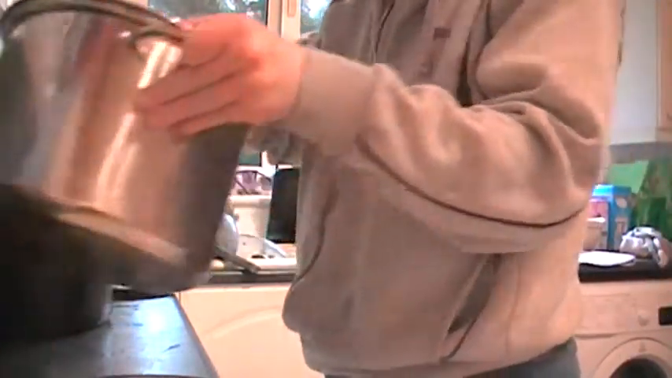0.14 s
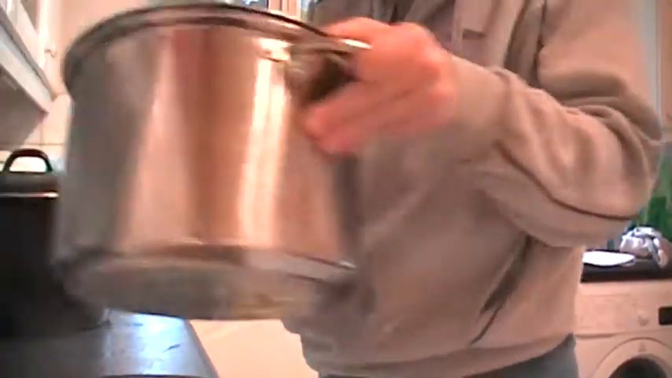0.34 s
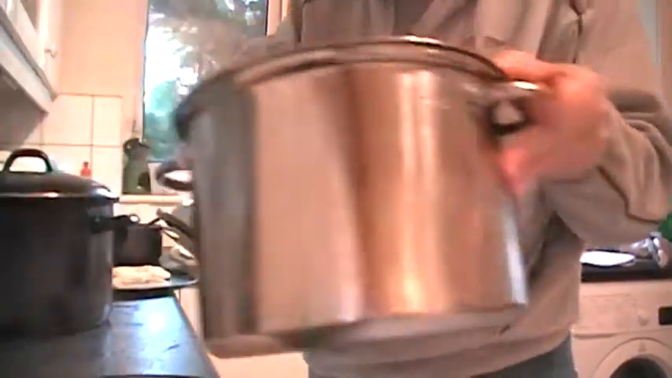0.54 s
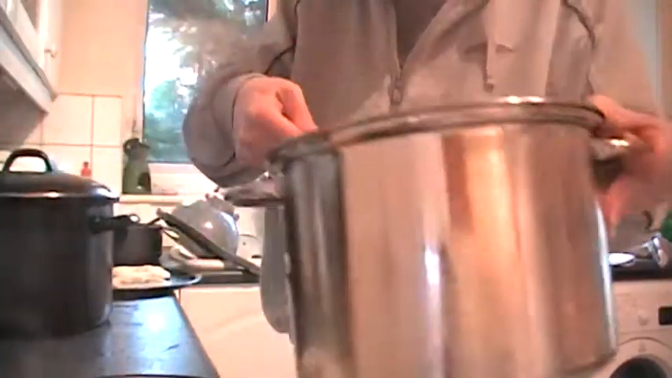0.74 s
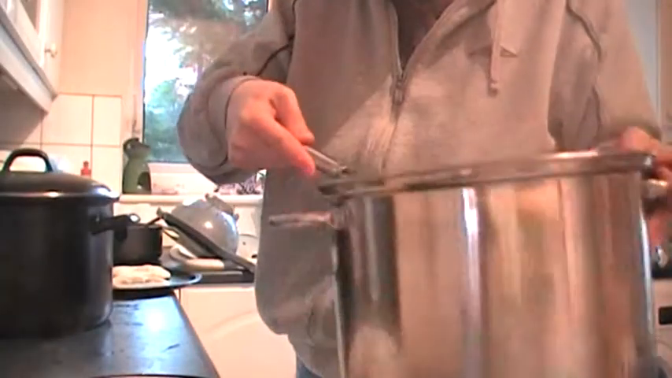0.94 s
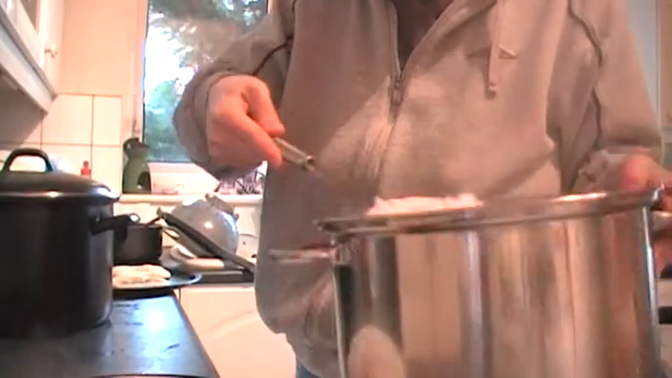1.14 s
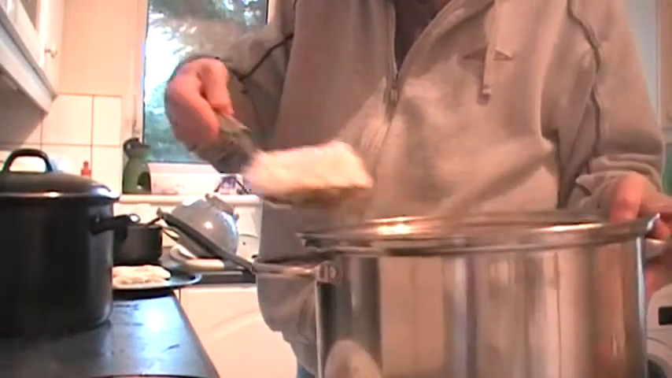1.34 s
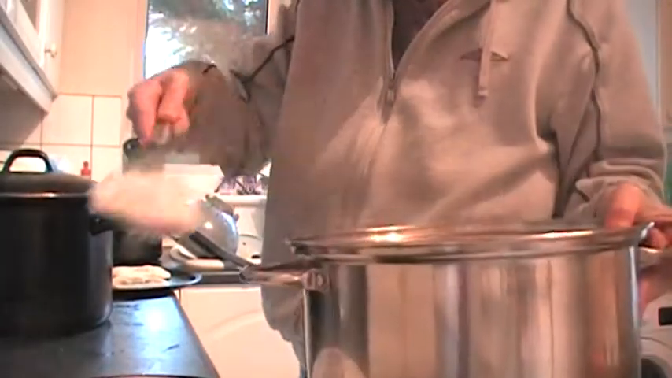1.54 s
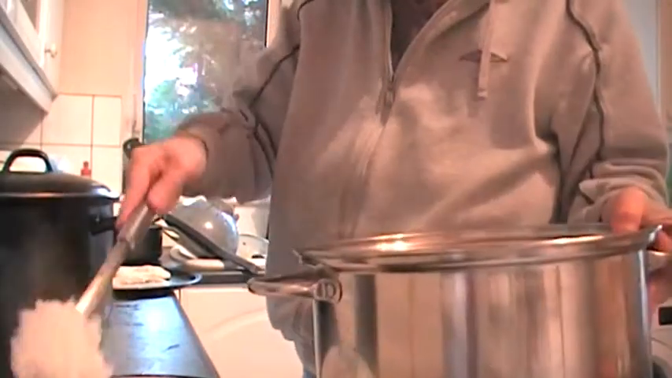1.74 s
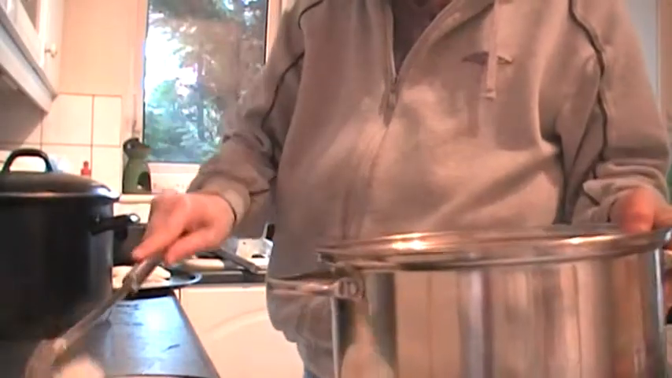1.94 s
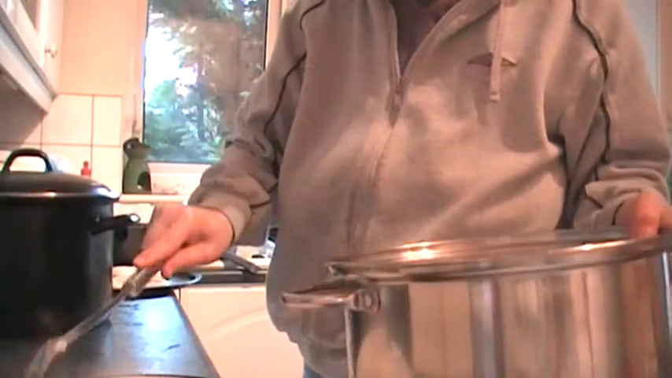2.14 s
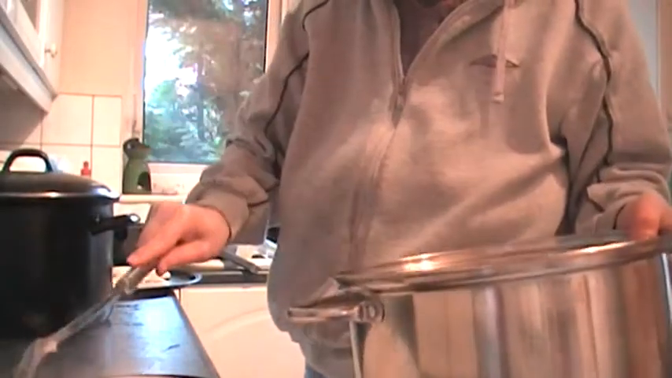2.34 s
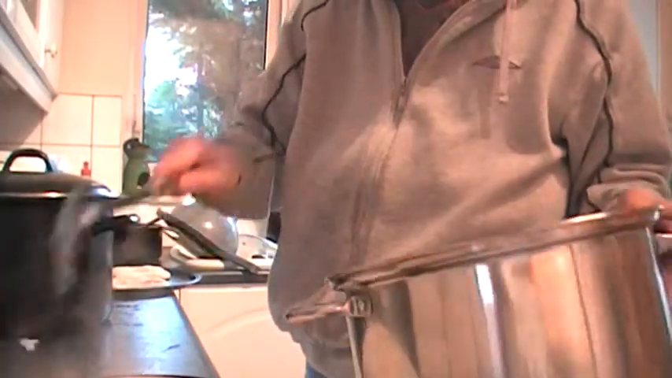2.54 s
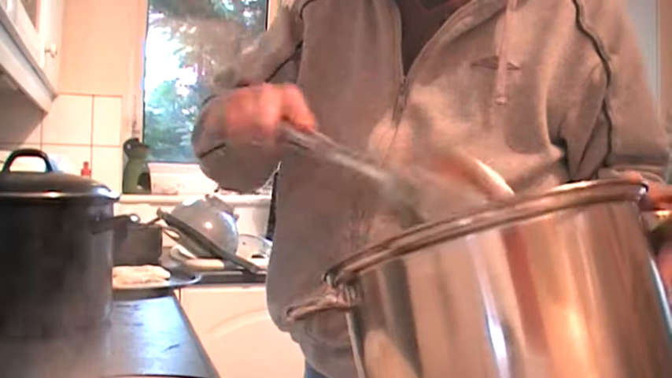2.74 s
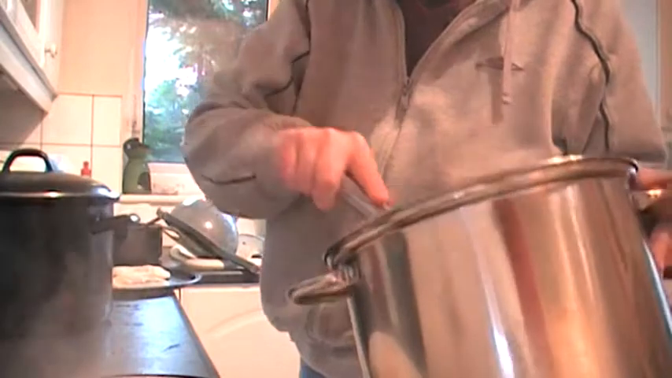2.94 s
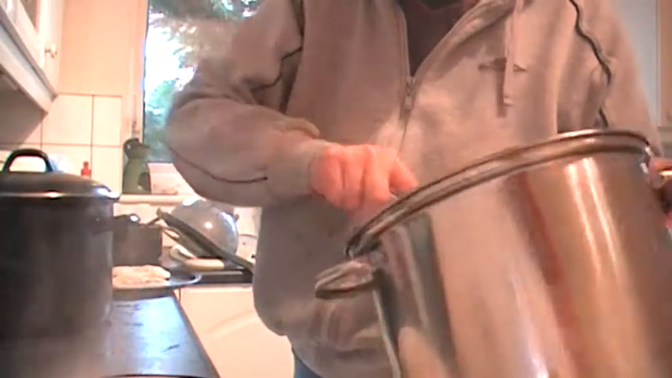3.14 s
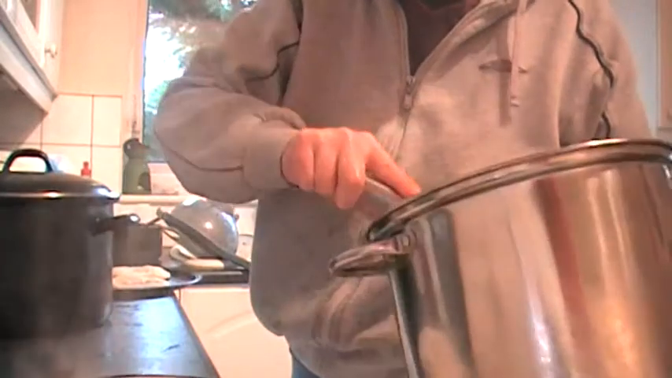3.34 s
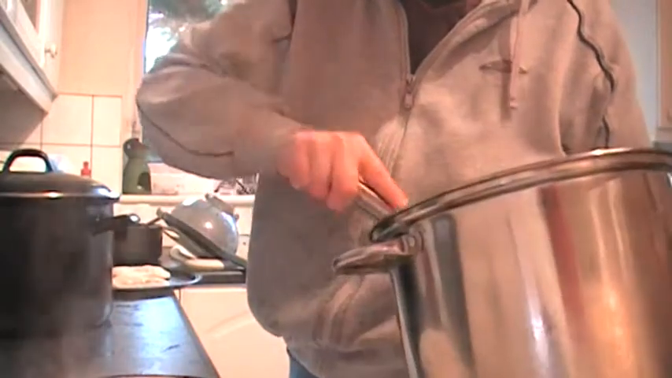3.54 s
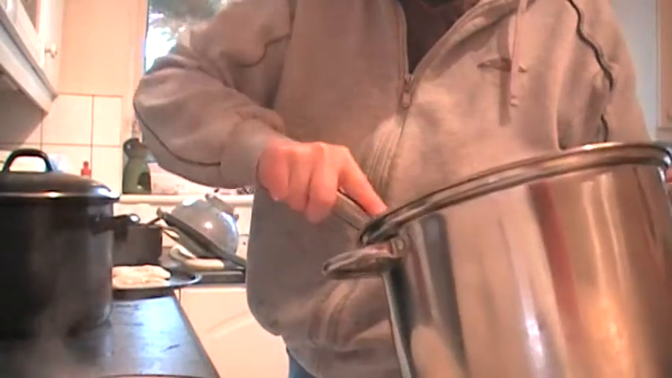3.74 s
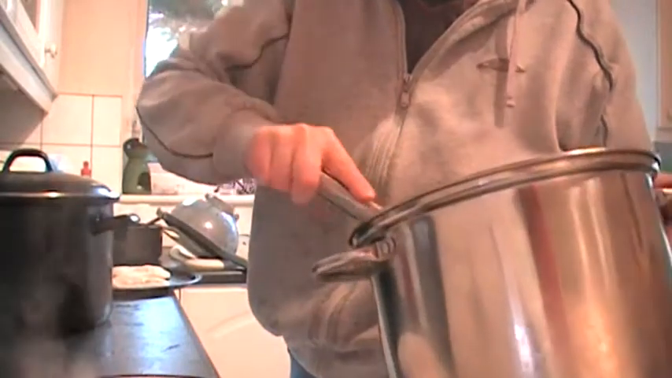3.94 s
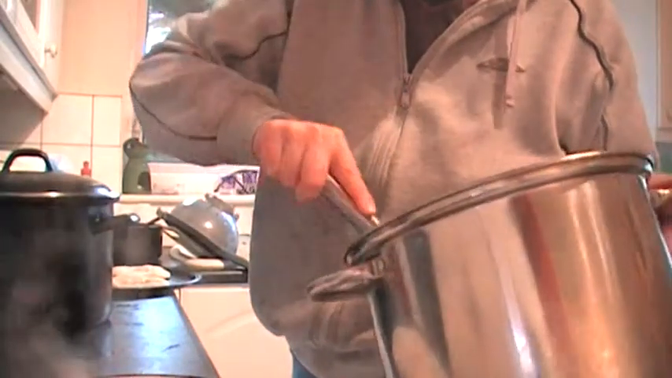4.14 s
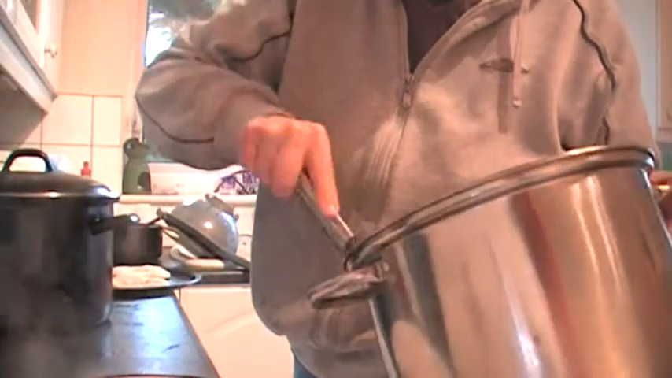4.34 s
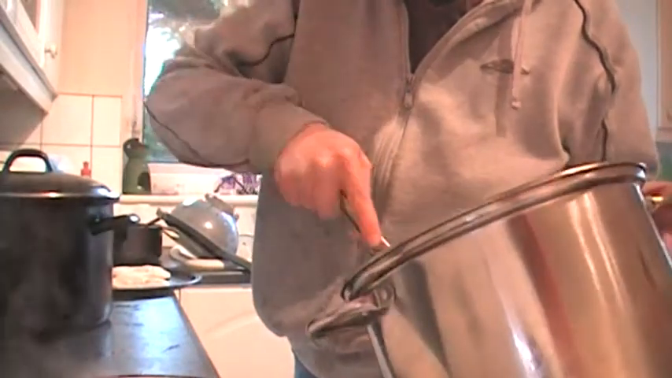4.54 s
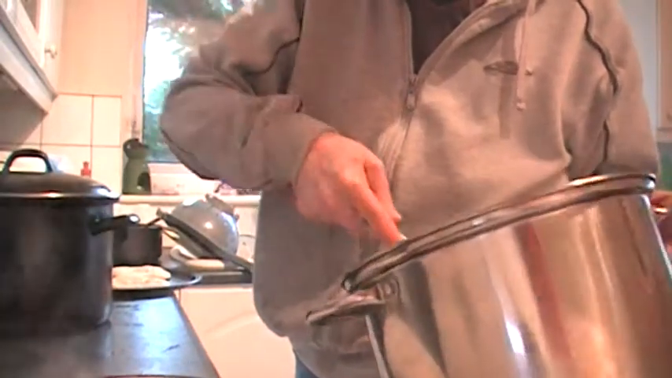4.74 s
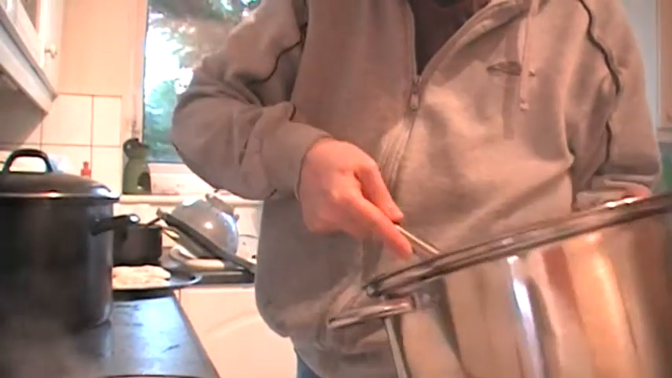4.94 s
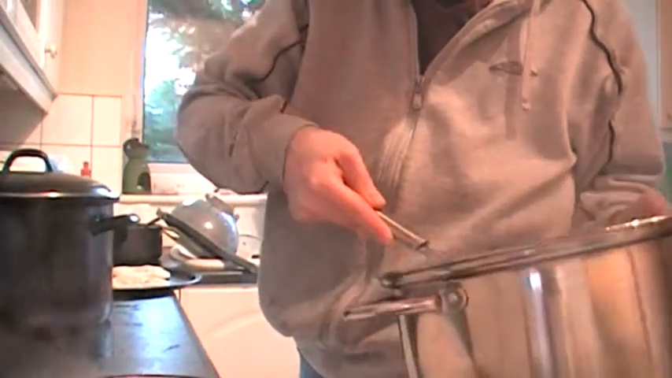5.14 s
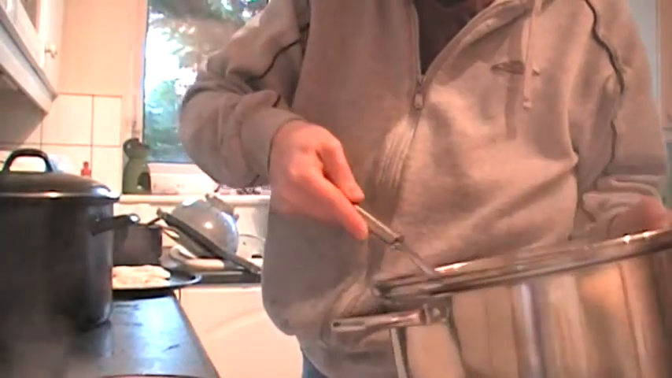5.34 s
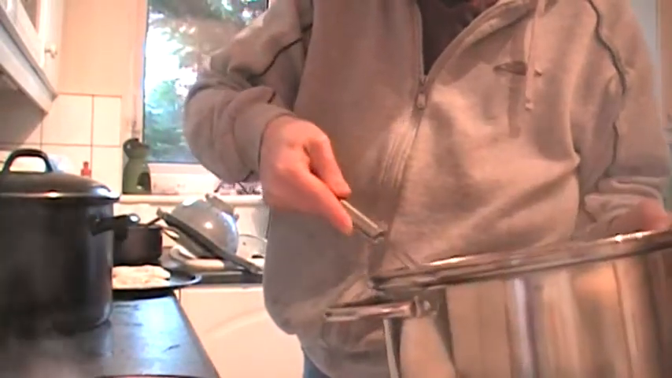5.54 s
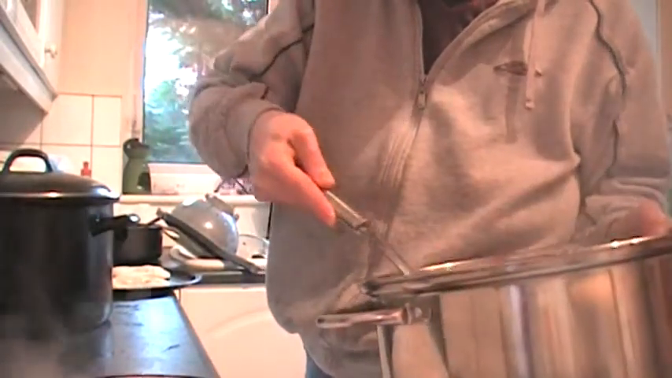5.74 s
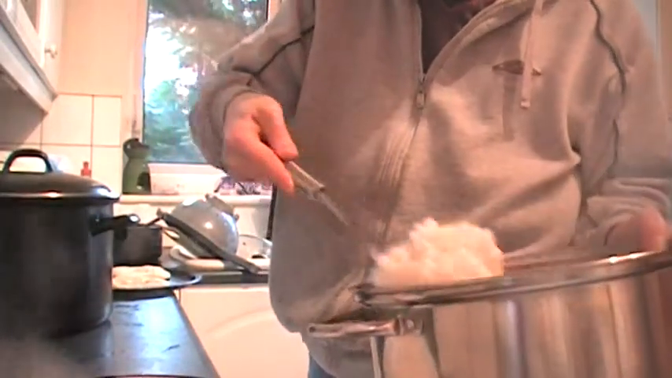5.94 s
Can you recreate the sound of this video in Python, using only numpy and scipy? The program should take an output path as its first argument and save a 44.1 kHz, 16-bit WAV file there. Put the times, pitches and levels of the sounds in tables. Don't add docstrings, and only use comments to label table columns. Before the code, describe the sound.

Close kitchen sounds: light steel knocks, three bright bowl taps, harsh spoon scrapes and clanks inside a rice pot, fading to faint rubbing.

```python
import sys
import numpy as np
from scipy import signal
from scipy.fft import rfft, irfft, next_fast_len
from scipy.io import wavfile
from scipy.ndimage import map_coordinates

SR = 44100
rng = np.random.default_rng(int(sys.argv[2]) if len(sys.argv) > 2 else 0)


def attenuation_scalar(level_db):
    decades = np.asarray(level_db, float) / 20
    return 10 ** decades


def bounce(signal):
    frames = np.transpose(np.atleast_2d(signal))
    limited = np.clip(frames, -1, 1)
    pcm = np.round(limited * 32767).astype(np.int16)
    wavfile.write(sys.argv[1], SR, pcm)


N = 267951

# frequency in Hz, level in dB, decay time t60 in s.
HOLLOW_MODES = [(232, -15, .1), (295, -7, .15), (345, -5, .15), (383, 0, .2), (425, -3, .15),
                (475, -8, .12), (540, -6, .07), (672, -5, .08), (970, -15, .12)]
# frequency in Hz, level in dB, decay time t60 in s.
WALL_MODES = [(1558, -28.5, 1.9), (2070, 2, 0.2), (2430, -4.5, 0.219), (2436, -15, 0.69), (3050, -6, 0.96),
              (3800, -5.5, 0.37), (3860, -9, 0.66), (4570, -5.5, 1.3), (5000, -13, 0.073), (5300, -4, 0.19),
              (6050, -5.5, 0.47), (5850, -33, 1.7), (6757, -8.5, 0.077), (6240, -7, 3.6), (7430, -9, 0.52),
              (8700, -7.5, 0.88)]
# frequency in Hz, level in dB, decay time t60 in s.
FREE_MODES = [(382, -5, .18), (662, -4, .08), (960, -8, .16), (1916, 0, .36), (2659, -8, .16),
              (2880, -12, .15), (3451, -14, .2), (3924, -12, .25), (4960, -14, .12), (5259, -18, .2),
              (6062, -17, .25), (6632, -18, .2), (8027, -16, .25), (8985, -18, .2)]
# frequency in Hz, density in dB per Hz.
SOFT_SPECTRUM = [(35, -63.5), (60, -21), (179, 3.5), (244, -3.5), (559, -0.5), (755, -10.5), (1200, -20),
                 (1560, -41.5), (2640, -120)]


def unit(x):
    return x / np.sqrt(np.mean(x ** 2) + 1e-20)


def along(points, hz):
    f, v = np.transpose(points)
    return np.interp(np.log(hz + 1), np.log(f + 1), v)


def coloured(x, response):
    n = x.shape[-1]
    padded = next_fast_len(n + 8192)
    hz = np.fft.rfftfreq(padded, 1 / SR)
    return irfft(rfft(x, padded) * response(hz), padded)[..., :n]


def noise(spectrum, size):
    return unit(coloured(rng.standard_normal(size), lambda hz: attenuation_scalar(along(spectrum, hz))))


def spread(pair, alike):
    def mid_side(hz):
        angle = np.arccos(np.clip(along(alike, hz), -1, 1)) / 2
        return np.array([np.cos(angle), np.sin(angle)])

    mid, side = coloured(pair, mid_side)
    return np.array([mid + side, mid - side])


def ring(modes, t, longest_s, scatter_db, flutter_hz):
    hz, db, t60 = np.transpose(modes)[:, :, None]
    strength = rng.standard_normal((len(modes), 1))
    offsets_hz = flutter_hz * rng.standard_normal((3, len(modes), 1))
    partners = np.sin(2 * np.pi * (hz + offsets_hz) * t).sum(axis=0)
    cluster = np.sin(2 * np.pi * hz * t) + 0.59 * partners
    decay_db = -60 * t / np.minimum(t60, longest_s)
    return np.sum(attenuation_scalar(db + scatter_db * strength + decay_db) * cluster, axis=0)


def resonances(modes, width_hz):
    def response(hz):
        total = 0
        for k, (centre, db, t60) in enumerate(modes):
            damping = 1j * hz * width_hz
            total = total + (-1) ** k * attenuation_scalar(db) * damping / (centre * centre - hz * hz + damping)
        return total

    return response


def add(out, s, x):
    start = round(s * SR)
    out[start:start + len(x)] += x


def swell(s, length, db, rise, sag, fall):
    u = np.arange(N * 1000 // SR + 2) / 1000 - s
    held = np.minimum(u, abs(length))
    released = np.maximum(u - abs(length), 0)
    return attenuation_scalar(2 * (db + np.where(u < 0, rise * u, -sag * held - fall * released)))


def gain(power):
    return np.interp(np.arange(N) * 1000 / SR, np.arange(len(power)), np.sqrt(power))


def hush():
    # frequency in Hz, density in dB per Hz.
    spectrum = [(12, -52), (20, -18.5), (80, -7), (159, -6.5), (192, -7), (341, -10.5), (604, -16.5),
                (815, -13), (1260, -17.5), (1480, -19.5), (2230, -28), (2420, -27.5), (13500, -41)]
    # frequency in Hz, left-right likeness from -1 to 1.
    likeness = [(60, 0.25), (240, -0.18), (950, 0.036), (3770, -0.13), (15000, 0.23)]
    return attenuation_scalar(-55) * spread(noise(spectrum, size=(2, N)), likeness)


def strokes():
    # frequency in Hz, density in dB per Hz.
    rasp_spectrum = [(410, -37), (700, -10.5), (1040, 1), (1380, -18), (1590, -2), (3930, -7.5),
                     (4650, -13.5), (7260, -9), (10200, -14.5), (15900, -38.5)]
    # start in seconds, length in seconds,
    # rasp in dB, hollow rumble over it in dB, brightness in dB.
    digs = [(2.95, .02, -20.5, -3, -2.5), (2.985, 0.034, -23.5, 8, 8), (3.075, 0.055, -34, 2, 12.5),
            (3.385, .045, -12.5, 4, 1), (3.455, 0.038, -8.5, 1.5, 1), (3.725, .04, -11.5, 7.5, 4),
            (3.782, 0.045, -5, -1.5, 0.5), (4.017, 0.075, -14.5, 14, 7), (4.285, 0.035, -23.5, -3, 9.5),
            (4.33, 0.14, -29, -10.5, 6.5)]
    drags = [(.001, 0.092, -30.5, -9.5, 3), (.37, 0.041, -41.5, -5.5, 11.5), (.466, 0.0012, -39, -13, 10.5),
             (.56, 0.23, -52.5, -2.5, 4.5), (.93, 0.2, -47.5, -6, -4), (.828, 0.0014, -45, -1.5, 1.5),
             (3.22, 0.096, -52.5, 4.5, 2), (4.51, 0.18, -36, -17, -3), (1.73, .005, -63, 1, 4),
             (4.76, 0.033, -39.5, -23, 0.5), (4.84, .02, -43.5, -10, -1), (4.89, 0.12, -44, -14, -1.5),
             (5.17, .02, -57, -13, -22), (5.33, .09, -61.5, 1, -26), (5.74, .04, -63.5, -17.5, -2)]
    clumps = map_coordinates(rng.standard_normal(N // 500 + 4), [np.arange(N) / 500])
    grain_db = 2.2 * rng.standard_normal(N) + 3.8 * clumps
    grit = rng.standard_normal(N) * attenuation_scalar(grain_db)
    broad = unit(coloured(grit, lambda hz: attenuation_scalar(along(rasp_spectrum, hz))))
    wall = unit(coloured(grit, resonances(WALL_MODES, width_hz=70)))
    rasp = unit(broad + attenuation_scalar(-3) * wall)
    dull = coloured(rasp, lambda hz: 1 / (1 + (hz / 3500) ** 4))
    hollow = unit(coloured(grit, resonances(HOLLOW_MODES[1:7], width_hz=55)))
    low = high = boom = 0
    # rise, sag and fall in dB/s
    for rows, rise, sag, fall in (digs, 2200, 45, 423), (drags, 340, 45, 384):
        for s, length, db, hollow_db, bright_db in rows:
            edge = swell(s, length, db, rise, sag, fall)
            creep = swell(s + length, 0, db - 31.5, rise, 0, 110)
            low = low + edge + creep
            high = high + edge * attenuation_scalar(2 * bright_db) + creep
            boom = boom + swell(s, length, db + hollow_db, rise, sag, 0.8 * fall) + creep
    return gain(low) * dull + gain(high) * (rasp - dull) + gain(boom) * hollow


def knocks():
    # start in seconds, peak in dB, hollow knock in dB,
    # brightness in dB, steel ring in dB.
    landings = [(0.1683, -12.5, -8, -19, -4.5), (0.2902, -18.5, -21, -18.5, -6),
                (0.8967, -11.5, -21, -11.5, 2.5), (1.1848, -51, 5.5, -22.5, 9),
                (2.9362, -20.5, -2, -11.5, 14), (2.9749, 1.5, -10, -15, 1), (3.0656, -11, -7.5, -8.5, 9),
                (3.3739, 1.5, -10, -19.5, -5.5), (3.4409, 12, -8, -16.5, 0.5),
                (3.492, -8.5, -51, -11, 15.5), (3.712, 0.5, -3.5, -18, -2), (3.7191, -2, 7, -12.5, 8),
                (3.771, 14.5, -6, -11, 6.5), (4.0075, 3.5, 0.5, -15, -5), (4.1909, -25, -14, -29.5, 4),
                (4.2732, -4.5, -3, -15.5, -6), (4.299, -9, -4.5, -24.5, 8.5)]
    touches = [(4.606, -31, -28, -18.5), (4.7347, -29.5, -0.5, -16), (4.7869, -37, -10, -19.5),
               (4.8383, -27.5, -14, -16.5), (4.8828, -24, -18.5, -18), (4.9578, -39.5, 0, -18),
               (4.9902, -37.5, -28, -17), (5.1322, -45, -22, -25.5), (5.1778, -51.5, -4, -32),
               (5.2613, -52, -2, -30), (5.294, -57, 8, -30), (5.3134, -38, -5, -24.5),
               (5.3705, -57, 12.5, -18), (5.4728, -55, 4, -28)]
    # frequency in Hz, density in dB per Hz.
    crack_spectrum = [(350, -24), (600, -11.5), (1980, -20.5), (3330, -22.5), (3770, -19.5), (5840, -22),
                      (6980, -16), (9440, -22.5), (15900, -51.5)]
    # frequency in Hz, level in dB, t60 in s.
    held_modes = [(220, -17, 0.45), (413, 8.5, 0.071), (524, -44, 0.26), (729, -44.5, 0.54),
                  (787, -57, 0.28), (1010, -64, 2.4), (1200, -40, 5.0)]
    out, t = np.zeros(N + SR), np.arange(SR // 3) / SR
    light = [(*touch, 8) for touch in touches]
    for s, db, hollow_db, bright_db, ring_db in [*landings, *light]:
        contact = 1 - np.exp(-t / (0.000086 * attenuation_scalar(-0.45 * db)))
        crack = attenuation_scalar(-6 - 60 * t / 0.053) * noise(crack_spectrum, size=len(t))
        wall = attenuation_scalar(ring_db - 24) * ring(WALL_MODES, t, longest_s=0.03, scatter_db=4, flutter_hz=59.7)
        spoon = ring(FREE_MODES[3:], t, longest_s=0.1, scatter_db=5.5, flutter_hz=24.95)
        steel = contact * (crack + wall + attenuation_scalar(ring_db - 32.5) * spoon)

        def tilt(hz):
            octaves = np.log2(np.clip(hz, 1000, 12000) / 3000)
            return attenuation_scalar((bright_db + 16.5) * octaves / 1.2)

        cavity = held_modes if s < 2 else HOLLOW_MODES
        boom = ring(cavity, t, longest_s=0.15, scatter_db=1.6, flutter_hz=16) * (1 - np.exp(-t / 0.001))
        add(out, s, attenuation_scalar(db) * (coloured(steel, tilt) + attenuation_scalar(hollow_db - 5) * boom))
    return out[:N]


def spoon_ringing():
    # start in seconds, level in dB.
    hits = [(.8965, -29), (0.54, -57.5), (4.838, -54)]
    out, t = np.zeros(N + SR), np.arange(SR // 3) / SR
    for s, db in hits:
        add(out, s, attenuation_scalar(db) * ring(FREE_MODES, t, longest_s=0.36, scatter_db=1.2, flutter_hz=14))
    return out[:N]


def taps():
    # start in seconds, blow in dB, ring in dB, longest ring in seconds,
    # thud on the counter in dB.
    blows = [
        (1.822, -36.5, 3, 0.26, -21),
        (1.828, -17.5, -4.5, 0.069, -19),
        (1.896, -40, 3, 0.19, -18.5),
        (1.9144, 10.5, -1, 0.31, -21),
        (2.153, 16, -4, 0.71, -27),
        (2.346, 15.5, -1.3, 0.55, -28),
    ]
    # frequency in Hz, density in dB per Hz.
    clink_spectrum = [(120, -73), (200, -45.5), (1100, -6.5), (1550, -13), (2120, -3), (2840, -10.5),
                      (3410, -2), (3880, -11), (6850, -15), (15900, -51.5)]
    # frequency in Hz, level in dB, decay time t60 in s.
    bowl_modes = [(545, -13, .5), (673, -18, .5), (996, -19, .6), (1272, -20, .4), (1583, -15, .7),
                  (1953, -12, .4), (2081, -9, .4), (2135, 0, .68), (2200, -9, .6), (2331, -7, .6),
                  (3015, -14, .6), (3214, -15, .6), (3400, -3, .65), (3430, -7, .7), (3822, -9, .55),
                  (3887, -9, .6), (4264, -19, .55), (4970, -5, .5), (5010, -9, .5), (5254, -11, .6),
                  (6309, -9, .6), (6800, -11, .3), (6950, -16, .5), (7564, -14, .55), (8441, -20, .45),
                  (8990, -21, .4), (10500, -25, .4), (11250, -28, .4), (11620, -30, .4), (12180, -29, .3)]
    out, t = np.zeros(N + SR), np.arange(3 * SR // 4) / SR
    for s, db, ring_db, longest_s, thud_db in blows:
        clink = attenuation_scalar(-14 - 60 * t / 0.031) * (1 - np.exp(-t / 0.0002)) * noise(clink_spectrum, size=len(t))
        thud = attenuation_scalar(thud_db - 60 * t / 0.14) * (1 - np.exp(-t / 0.0052)) * noise(SOFT_SPECTRUM, size=len(t))
        bowl = attenuation_scalar(ring_db - 28) * ring(bowl_modes, t, longest_s, scatter_db=3, flutter_hz=29.68)
        shimmer = attenuation_scalar(ring_db - 25.5 - 60 * t / (1.02 * longest_s)) * noise(clink_spectrum, size=len(t))
        add(out, s, attenuation_scalar(db) * (clink + thud + bowl + shimmer))
    return out[:N]


def slump():
    # start in seconds, length in seconds, level in dB, then rise, sag and fall in dB/s.
    slide = (2.33, .11, -23, 95, 30, 150)
    return gain(swell(*slide)) * noise(SOFT_SPECTRUM, size=N)


def rim_hits():
    # start in seconds, level in dB.
    hits = [(2.9357, -19), (4.298, -19), (5.315, -52.5)]
    # frequency in Hz, level in dB, decay time t60 in s.
    rim_modes = [(1000, -6, .1), (1588, -2, .09), (1850, -10, .08), (2280, 0, .1), (2500, -7, .06),
                 (2885, -11, .08), (3838, -16, .07)]
    out, t = np.zeros(N + SR), np.arange(SR // 3) / SR
    for s, db in hits:
        add(out, s, attenuation_scalar(db) * ring(rim_modes, t, longest_s=0.1, scatter_db=1.5, flutter_hz=20))
    return out[:N]


def kitchen(x):
    # frequency in Hz, decay time t60 in s.
    tiles = [(100, 0.55), (400, 0.28), (2000, 0.29), (6000, 0.27), (14000, 0.24)]
    # frequency in Hz, left-right likeness from -1 to 1.
    likeness = [(100, 0.92), (500, 0.96), (2000, 0.8), (6000, 0.8), (12000, 0.23)]
    step, delay, out = SR // 4, 260, np.zeros((2, N + 2 * SR))
    for start in range(0, N, step):
        hz, t, z = signal.stft(rng.standard_normal((2, SR)), SR, nperseg=256)
        decay = attenuation_scalar(-60 * t / along(tiles, hz)[:, None])
        tail = signal.istft(z * decay, SR, nperseg=256)[1]
        tail = tail / np.linalg.norm(tail[0])
        wet = signal.fftconvolve(x[None, start:start + step], tail, axes=1)
        out[:, start + delay:start + delay + wet.shape[1]] += wet
    return spread(out[:, :N], likeness)


def ports(x):
    # frequency in Hz, level in dB.
    difference = [(100, -11.5), (300, -33), (1000, -7.5), (4000, -15), (8000, -5.5), (13000, 4.5)]
    scatter = rng.standard_normal(150) * attenuation_scalar(-60 * np.arange(150) / 300)
    scattered = signal.fftconvolve(x, scatter / np.linalg.norm(scatter))[:N]
    side = coloured(scattered, lambda hz: attenuation_scalar(along(difference, hz)))
    return np.array([x + side, x - side]) * attenuation_scalar([[0.4], [-0.4]])


def follow(x, seconds):
    pole = np.exp(-1 / (seconds * SR))
    return signal.lfilter([1 - pole], [1, -pole], x)


def scene():
    near = strokes() + knocks() + spoon_ringing() + taps() + slump() + rim_hits()
    near = coloured(near, lambda hz: (1j * hz / (1j * hz + 150)) ** 3)
    return ports(near) + attenuation_scalar(-2) * kitchen(near) + hush()


def band_limit(x):
    return signal.sosfilt(signal.butter(12, 16040, fs=SR, output="sos"), x)


def record(dry):
    dry = coloured(dry, lambda hz: 1 / (1 + 1j * hz / 15000) ** 3)
    threshold_db, share = -24, 0.8
    sense_s, attack_s, recover_db_s = 0.003, 0.0045, 95
    level_db = 10 * np.log10(follow(np.mean(dry ** 2, axis=0), sense_s) + 1e-12)
    over_db = np.maximum(level_db - threshold_db, 0)
    ramp = recover_db_s / share * np.arange(N) / SR
    held_db = np.maximum.accumulate(over_db + ramp) - ramp
    ducked = dry * attenuation_scalar(-share * follow(held_db, attack_s))
    clipped = coloured(np.clip(ducked, -1, 1), lambda hz: 1j * hz / (1j * hz + 25))
    return band_limit(clipped)


dry = scene()
out = record(dry)
bounce(out)
```